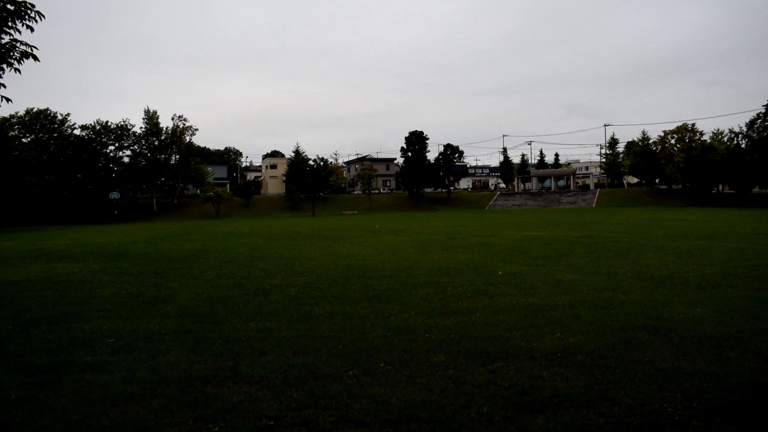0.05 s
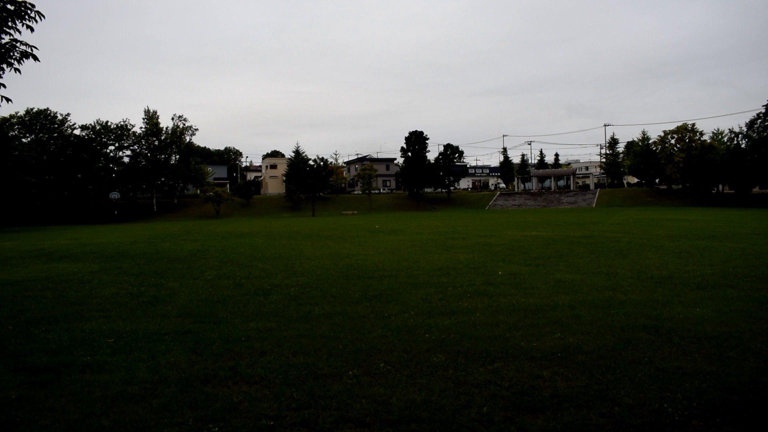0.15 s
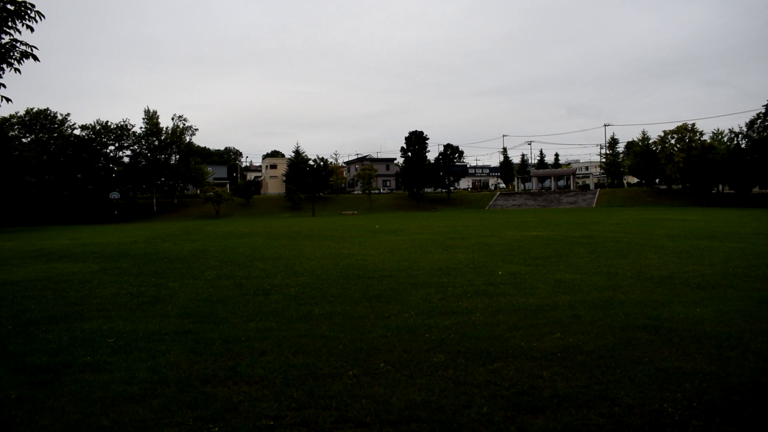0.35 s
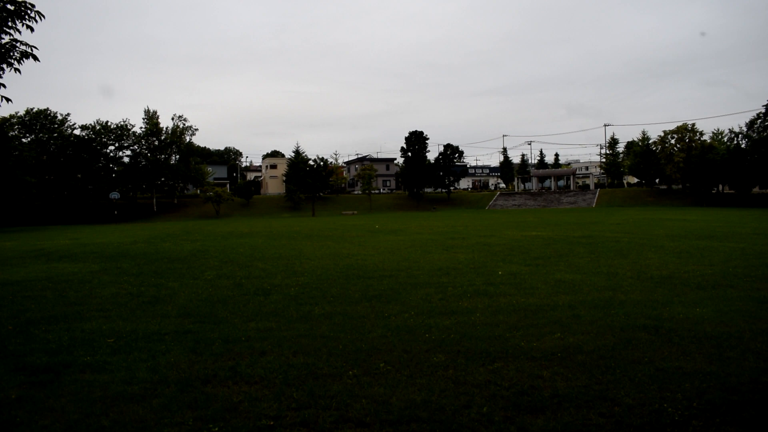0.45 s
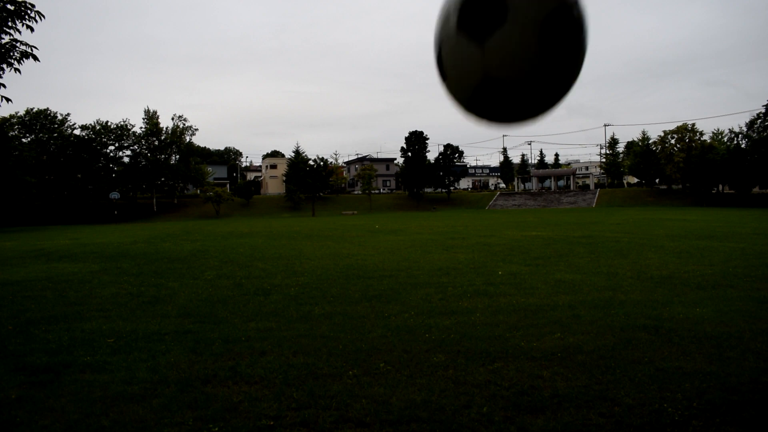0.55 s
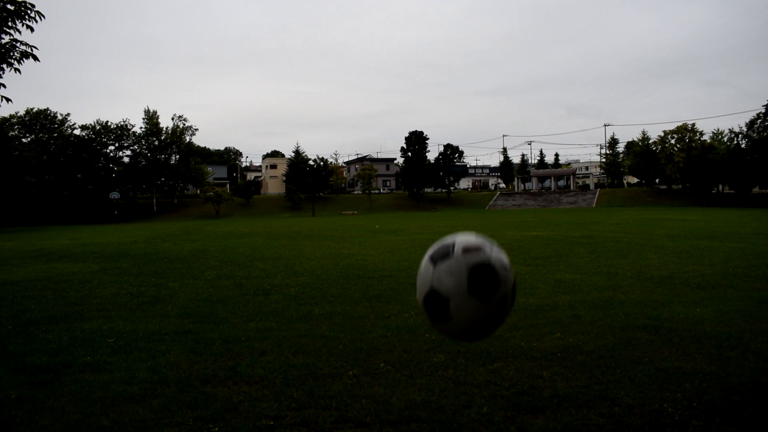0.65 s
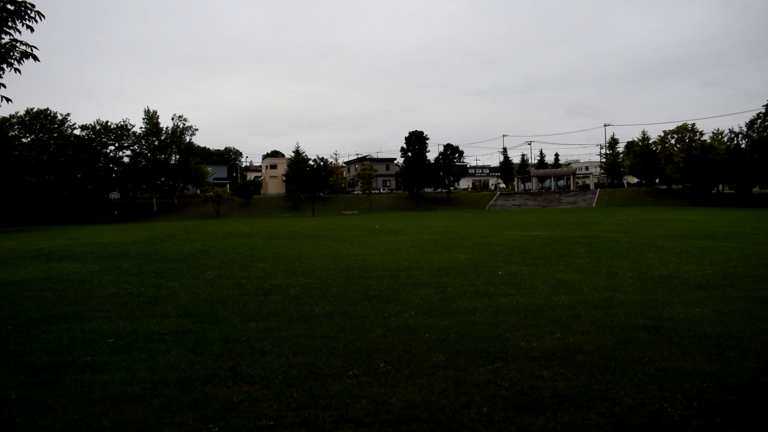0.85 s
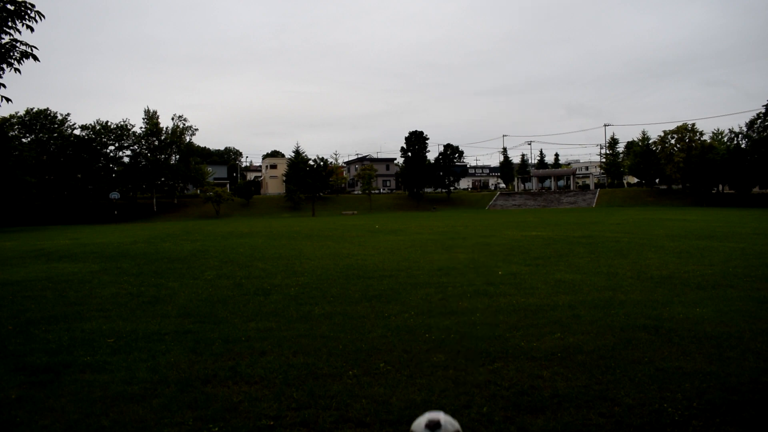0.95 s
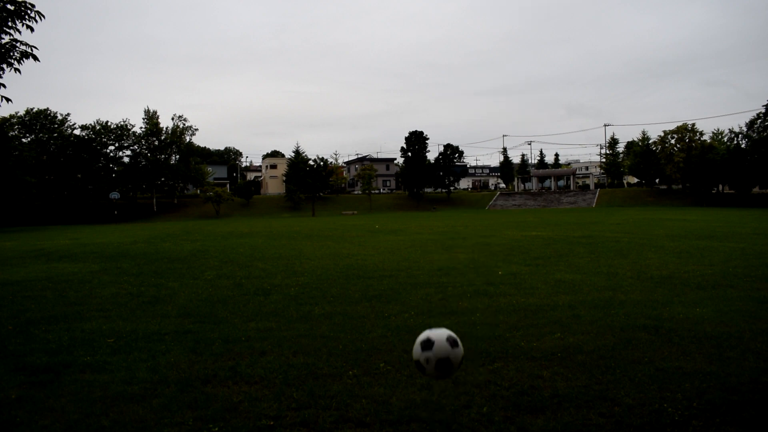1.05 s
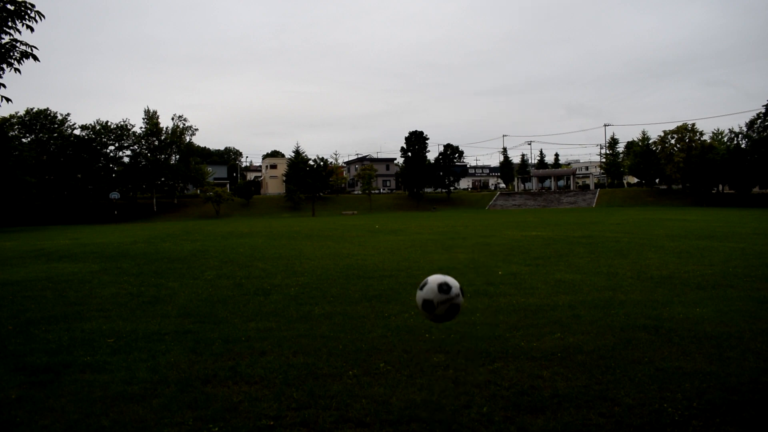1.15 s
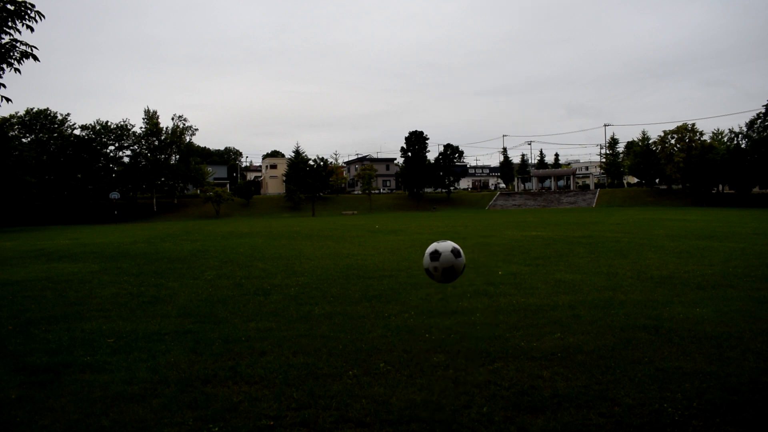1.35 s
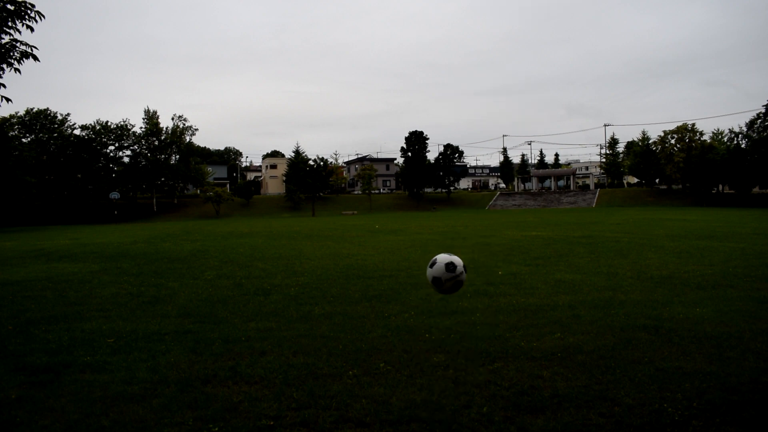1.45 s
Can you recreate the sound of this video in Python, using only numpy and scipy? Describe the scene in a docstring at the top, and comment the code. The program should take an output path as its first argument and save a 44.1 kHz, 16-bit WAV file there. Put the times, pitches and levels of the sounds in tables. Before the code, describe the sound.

Soccer ball hit twice outdoors: first a bright, crackling palm slap with short hollow ringing, then a rustle and a duller, lower kick. Close stereo microphone, faint field echo, steady distant hiss and drone.

```python
"""An open park hisses and drones in the distance, with a low rumble that comes and goes: coloured noise.
Close by, a hand slaps a soccer ball: sharp pulses and crackling noise set the air inside it ringing.
Clothes and grass rustle, with a few brushes of fingers and sleeve, as shaped bursts of noise.
A little past the middle a shoe scuffs and kicks the ball: rubbing noise, dull pulse, short ringing.
Slap and kick also come back as a weak, dull echo from the field."""
import sys
import numpy as np
from scipy import signal
from scipy.fft import rfft, irfft, next_fast_len
from scipy.io import wavfile
from scipy.ndimage import map_coordinates

SR = 44100
rng = np.random.default_rng(int(sys.argv[2]) if len(sys.argv) > 2 else 0)


def transcribe(u):
    """Save the signal u as a 16-bit wav file named by the first command-line argument.

    u: samples, shape (n,) or (channels, n), limited to [-1, 1]; the rate is SR.
    q: integer samples, one column per channel.
    """
    v = np.clip(np.atleast_2d(u).T, -1, 1)
    q = np.round(v * 32767).astype(np.int16)
    wavfile.write(sys.argv[1], SR, q)


N = 66150  # length in samples: 1.5 s

# Ringing notes of the air inside the ball: pitch_hz [Hz], relative_level_db [dB],
# t60_s [s to fade by 60 dB]
CAVITY_NOTES = [(1060, -6, .29), (1232, -4, .2), (1598, -5, .18), (1785, -4, .16), (1964, -2, .18),
                (2043, -3, .2), (2167, -5, .24), (2715, -2, .15), (2820, -3, .15), (3088, -4, .14),
                (3334, -4, .12), (3564, -3, .15), (3882, -2, .13), (4036, -3, .12)]


def amp(db):
    """Turn decibels into a gain."""
    return 10 ** (np.asarray(db) / 20)


def unit(x):
    """Scale a sound to an rms (average strength) of 1."""
    return x / np.sqrt(np.mean(x ** 2) + 1e-20)


def along(points, hz):
    """Read a (pitch, value) table at any pitch, with straight lines on a log pitch axis."""
    pitches, values = np.transpose(points)
    return np.interp(np.log(hz + 1), np.log(pitches + 1), values)


def curve(rows):
    """Turn (seconds, value) rows into one value per sample."""
    return np.interp(np.arange(N) / SR, *np.transpose(rows))


def wobble(rate):
    """A smooth random curve through `rate` random points a second."""
    points = rng.standard_normal(int(N * rate / SR) + 4)
    return map_coordinates(points, [np.arange(N) * rate / SR])


def filtered(x, response):
    """Multiply the spectrum of x by a function of pitch."""
    padded = 2 * next_fast_len(N)
    hz = np.fft.rfftfreq(padded, 1 / SR)
    return irfft(rfft(x, padded) * response(hz), padded)[..., :N]


def noise(colour_db):
    """Noise of rms 1, coloured by a function of pitch."""
    return unit(filtered(rng.standard_normal(N), lambda hz: amp(colour_db(hz))))


def near_noise(colour_db):
    """Stereo noise from a close source; left and right differ mostly in the treble."""
    # Stereo width: pitch_hz [Hz], side_minus_mid_db [dB]
    near_width = [(500, -33), (2000, -44), (5000, -11.5), (9000, -17), (14000, -8)]
    side = filtered(noise(colour_db), lambda hz: amp(along(near_width, hz)))
    return noise(colour_db) + np.array([[1], [-1]]) * side


def swell(s, rise, t60):
    """Loudness shape: climbs 60 dB in `rise` seconds to a peak at s, falls 60 dB in `t60` seconds."""
    t = np.arange(N) / SR - s
    return np.exp(-np.log(1000) * np.maximum(-t / rise, t / t60))


def ring(modes, s):
    """Struck bodies ring as fading sines, here from s on; neighbours start in opposite directions."""
    t = np.maximum(np.arange(N) / SR - s, 0)
    out = np.zeros(N)
    for k, (hz, db, t60) in enumerate(modes):
        fade = np.exp(-np.log(1000) * t / t60)
        out += (-1) ** k * amp(db) * np.sin(2 * np.pi * hz * t) * fade
    return out


def pulse(colour_db, s):
    """One pressure pulse from a sudden contact at s: peak 1, coloured by a function of pitch."""
    # Folding the cepstrum onto its first half makes the pulse start at once, with nothing before it.
    cepstrum = irfft(np.log(amp(colour_db(np.fft.rfftfreq(N, 1 / SR)))), N)
    folded = 2 * cepstrum * (np.arange(N) < N // 2)
    shape = irfft(np.exp(rfft(folded)), N)
    shape = shape / np.abs(shape).max()
    return filtered(shape, lambda hz: np.exp(-2j * np.pi * hz * s))  # delay to s


def park_air():
    """One channel of far-off air: traffic hiss, leaves in the breeze, engine drone and air rumble."""
    # Colours of the four noises: pitch_hz [Hz], relative_level_db [dB per Hz]
    traffic_colour = [(20, -9.5), (45, -15), (110, -14), (225, -14), (380, -16), (600, -6.5), (850, -1),
                      (1050, 0), (1500, -4), (2300, -6), (3200, -13.5), (4700, -21.5), (6000, -24),
                      (7500, -32), (11500, -36.5), (16000, -45)]
    leaves_colour = [(100, -42), (1000, -3.5), (2200, -0.5), (3000, -5), (4500, -11.5), (7000, -32),
                     (16000, -41)]
    drone_colour = [(20, -18), (60, -12.5), (110, -1), (150, -0.5), (185, -5.5), (225, 1), (270, -12),
                    (500, -29), (2000, -70)]
    rumble_colour = [(10, 19), (30, -20), (46, 1), (70, -10), (150, -38), (500, -72)]
    # Their loudness over time: time_s [s], level_db [dB]
    leaves_level = [(0, -53.5), (.3, -48.5), (.55, -51), (.66, -52.5), (.85, -59), (1.1, -54.5),
                    (1.3, -56.5), (1.5, -70)]
    drone_level = [(0, -63.5), (.5, -60), (.85, -59.5), (1.5, -57)]
    rumble_level = [(0, -68), (.3, -82), (.72, -82), (.84, -52), (.95, -63), (1.15, -55.5), (1.35, -57),
                    (1.5, -58)]
    traffic_db, waver_db = -44, .4

    traffic_gain = amp(traffic_db + waver_db * wobble(8.07))
    traffic = traffic_gain * noise(lambda hz: along(traffic_colour, hz))
    leaves = amp(curve(leaves_level)) * noise(lambda hz: along(leaves_colour, hz))
    drone = amp(curve(drone_level)) * noise(lambda hz: along(drone_colour, hz))
    rumble = amp(curve(rumble_level)) * noise(lambda hz: along(rumble_colour, hz))
    return traffic + drone + leaves + rumble


def park():
    """Stereo park air: a shared middle plus a weaker independent side that widens the sound."""
    # Stereo width: pitch_hz [Hz], side_minus_mid_db [dB]
    park_width = [(30, -11), (120, -23), (400, -22), (1000, -20.5), (3000, -9.5), (8000, -7.5),
                  (16000, -43)]
    mid = park_air()
    side = filtered(park_air(), lambda hz: amp(along(park_width, hz)))
    return np.array([mid + side, mid - side])


def rustle(grain_db=2):
    """Clothes and grass rub as grainy noise; fingers and sleeve add short brushes around one pitch."""
    # Loudness before the grain: time_s [s], level_db [dB]
    rustle_level = [(0, -74), (.2, -65), (.34, -53.5), (.38, -59), (.41, -52.5), (.45, -54.5), (.5, -65.5),
                    (.75, -66), (.88, -61.5), (.95, -54), (1.02, -59), (1.12, -72), (1.5, -71)]
    # Colour: pitch_hz [Hz], relative_level_db [dB per Hz]
    rustle_colour = [(1500, -6), (3500, 3.5), (8000, -1), (11000, -4.5), (16000, -17)]
    # Brushes: peak_s [s], level_db [dB], rise_s [s], t60_s [s], centre_hz [Hz]
    brushes = [(0.368, -45.5, 0.013, 0.019, 9100), (.402, -41, 0.019, 0.026, 5300),
               (.402, -38.5, .015, .03, 2600), (.423, -47, 0.026, 0.041, 8500),
               (1.435, -63.5, .04, .2, 11900)]
    width_octaves = 0.35

    gain = amp(curve(rustle_level) + grain_db * wobble(330))
    out = gain * near_noise(lambda hz: along(rustle_colour, hz))
    for s, db, rise, t60, centre_hz in brushes:
        def band(hz):
            octaves_off = np.log2((hz + 1) / centre_hz)
            return -10 * np.log10(1 + (2 * octaves_off / width_octaves) ** 2)
        out += amp(db) * swell(s, rise, t60) * near_noise(band)
    return out


def overtones(count=300):
    """A dense crowd of air notes in the ball, low to high, after one blow; higher notes fade sooner."""
    # Colour of the crowd of notes: pitch_hz [Hz], relative_level_db [dB]
    crowd_colour = [(400, -1), (800, -0.5), (1500, 1), (3000, 2), (5000, -2), (8000, -4), (11000, -7),
                    (16000, -21)]
    t60_at_4khz_s, shortening = 0.14, 0.16  # shortening: power of pitch that divides the fading time

    t = np.arange(SR // 3) / SR
    place, phase, skew = rng.random((3, count, 1))
    low, high = crowd_colour[0][0], crowd_colour[-1][0]
    # One randomly placed note in each of `count` equally wide strips.
    hz = low + (high - low) * (np.arange(count)[:, None] + place) / count
    gain = amp(along(crowd_colour, hz))
    gain = gain / np.linalg.norm(gain)
    t60 = t60_at_4khz_s / 2 ** (shortening * np.log2(hz / 4000))
    modes = gain * np.sin(2 * np.pi * (hz * t + phase)) * np.exp(-np.log(1000) * t / t60)
    side = ((skew - .5) * modes).sum(0) * .5  # each note leans a little left or right
    return modes.sum(0) + np.array([[1], [-1]]) * side


def slap():
    """Fingers and palm land in quick succession; each contact snaps, crackles and rings the ball's air."""
    # Contacts: start_s [s], snap_level_db [dB], crackle_t60_s [s], brightness [dB per octave]
    contacts = [(.2256, -29.5, 0.023, -6), (.2286, -16.5, 0.018, 1.5), (.2357, -14, .003, 7),
                (.2416, -10, .005, 0), (.2425, -9, .006, 2), (.2438, -11, .007, -3), (.2483, -22, .008, 3),
                (.2528, -18, .009, 6), (.256, -27, .03, 0), (.2608, -28, .03, -1),
                (0.2673, -30.5, 0.039, 15), (.294, -39, .08, -6), (0.306, -37, .015, 2)]
    # Colour of hand on skin of the ball: pitch_hz [Hz], relative_level_db [dB]
    skin = [(100, -11), (300, -23), (600, -10), (1100, -8), (2000, 0.5), (2900, -4), (3800, 5.5),
            (6000, -7.5), (11000, -10.5), (16000, -27)]
    crackle_db, crackle_grain_db = -1.5, 3  # crackle relative to the snap; its random unevenness
    bright_hz = 3000  # brightness acts above this
    ring_db, overtone_db = -25, -12.5  # relative to the contacts
    lowest_hz = 393  # the slap carries little below this

    out, blows = np.zeros((2, N)), np.zeros(N)
    for s, db, t60, bright_db in contacts:
        def skin_colour(hz):
            return along(skin, hz) + bright_db * np.log2(np.hypot(1, hz / bright_hz))
        crackle_gain = amp(crackle_db + crackle_grain_db * wobble(1500))
        crackle = crackle_gain * swell(s, 0.00068, t60) * near_noise(skin_colour)
        out += amp(db) * (crackle - pulse(skin_colour, s))
        blows[round(s * SR)] += amp(db)
    # The main notes ring once, from the strongest contact; the crowd of notes rings after every contact.
    strongest_s = np.argmax(blows) / SR
    out += np.linalg.norm(blows) * amp(ring_db) * ring(CAVITY_NOTES, strongest_s)
    out += amp(overtone_db) * signal.fftconvolve(blows[None], overtones(), axes=1)[:, :N]
    low_cut = signal.butter(2, lowest_hz, 'highpass', fs=SR, output='sos')
    return signal.sosfilt(low_cut, out)


def kick():
    """The shoe scuffs the ball, squeezes it and lets go; casing and inner air ring briefly."""
    # Rubbing before the blow, then a short rustle after it: peak_s [s], level_db [dB], rise_s [s], t60_s [s]
    scuffs = [(0.8937, -39, 0.0044, 0.011), (0.9325, -25.5, 0.03, 0.052), (0.951, -35, 0.012, 0.15)]
    # Colour of the rubbing and rustle: pitch_hz [Hz], relative_level_db [dB per Hz]
    scuff_colour = [(30, -35), (120, -2), (700, 0), (1700, -2.5), (3200, -15), (6000, -23), (16000, -42)]
    # Colour of the thump: pitch_hz [Hz], relative_level_db [dB]
    thump_colour = [(25, -40), (50, -25), (90, -5.5), (150, -0.5), (300, -1.5), (530, 1.5), (800, -4),
                    (1200, -10.5), (1700, -18.5), (2500, -26), (5000, -41), (16000, -56)]
    # Notes of the flexing casing: pitch_hz [Hz], level_db [dB], t60_s [s]
    casing = [(149, -37, 0.085), (300, -32.5, 0.088), (412, -37, 0.073), (598, -24.5, 0.069),
              (770, -54, 0.1)]
    kick_s, kick_db, ring_db = .9354, -6.5, -47.5
    release_s, release_db = .9416, -16.5
    smack_db, smack_hz = 8, 1180  # the release is boosted around this pitch

    def thump(hz):
        return along(thump_colour, hz)

    def smack(hz):
        return thump(hz) + smack_db * np.exp(-2 * np.log2((hz + 1) / smack_hz) ** 2)

    # Squeeze and release push the air in opposite directions.
    out = amp(release_db) * pulse(smack, release_s) - amp(kick_db) * pulse(thump, kick_s)
    for s, db, rise, t60 in scuffs:
        out += amp(db) * swell(s, rise, t60) * noise(lambda hz: along(scuff_colour, hz))
    return out + ring(casing, kick_s) + amp(ring_db) * ring(CAVITY_NOTES, kick_s)


def field(x):
    """Ground and trees scatter a weak, dull echo: x is smeared by a fading burst of noise."""
    # Colour of the echo: pitch_hz [Hz], relative_level_db [dB]
    echo_colour = [(100, -9), (400, -7), (900, -8), (1800, 8), (3500, -11), (7000, -21), (16000, -26)]
    echo_db, peak_s, rise_s, t60_s = -20.5, 0.052, 0.16, 0.33

    tail = swell(peak_s, rise_s, t60_s) * near_noise(lambda hz: 0 * hz)  # all pitches alike
    tail = tail / np.linalg.norm(tail[0])
    tail = filtered(tail, lambda hz: amp(echo_db + along(echo_colour, hz)))
    return signal.fftconvolve(x, tail, axes=1)[:, :N]


def scene():
    """Ball and player in the open air; only the ball's sounds get the echo."""
    ball = slap() + kick()
    return ball + field(ball) + rustle() + park()


def record(dry):
    """The right microphone is a little brighter; nothing passes above the band limit."""
    # Channel balance: pitch_hz [Hz], left_minus_right_db [dB]
    balance = [(300, 0), (2000, -.3), (4500, -.9), (8500, -2.4), (13000, -.4)]
    top_hz = 15850
    halves = np.array([[.5], [-.5]])  # left takes half the difference, right the opposite half
    return filtered(dry, lambda hz: amp(along(balance, hz) * halves) * (hz < top_hz))


dry = scene()
out = record(dry)
transcribe(out)
```